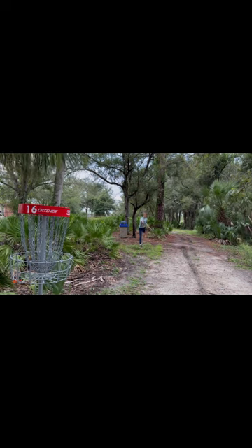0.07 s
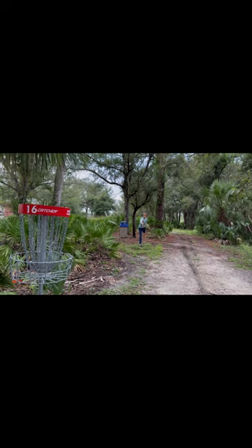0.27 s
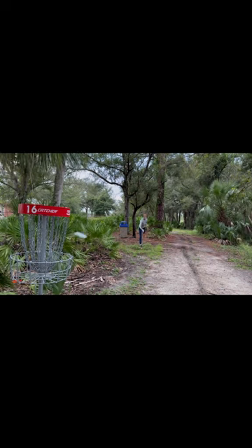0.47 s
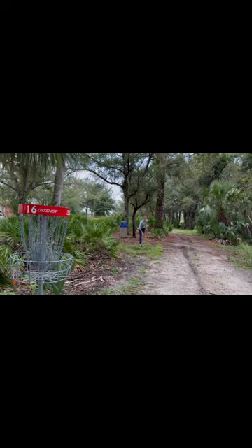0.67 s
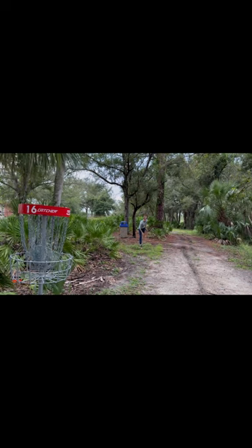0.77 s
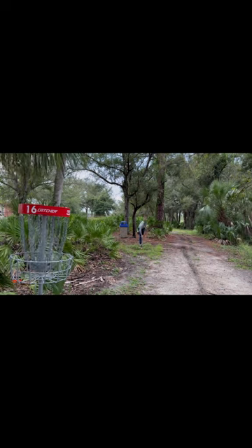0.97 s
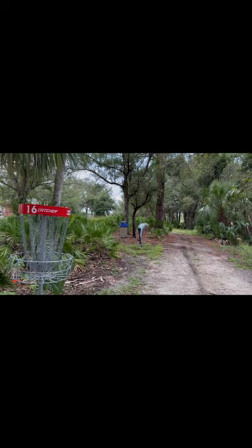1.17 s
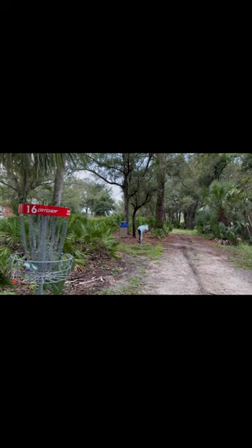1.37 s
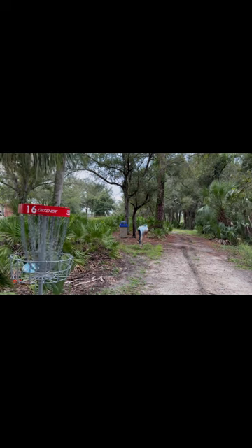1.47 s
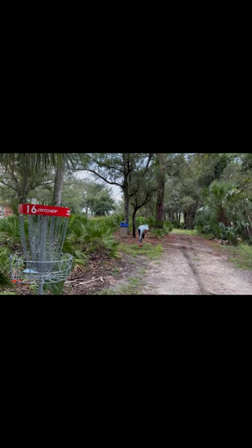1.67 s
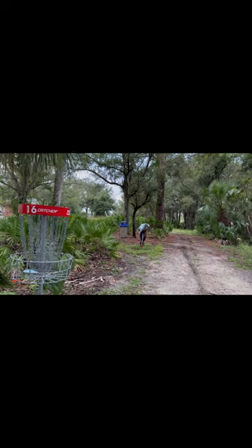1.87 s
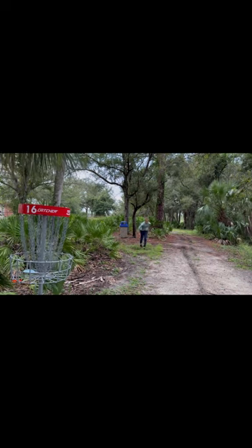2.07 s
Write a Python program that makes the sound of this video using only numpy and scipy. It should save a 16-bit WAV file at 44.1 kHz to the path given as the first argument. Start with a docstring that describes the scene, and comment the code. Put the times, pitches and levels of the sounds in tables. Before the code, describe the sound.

Close stereo pickup of metal chains struck by a flying disc: dull plastic knocks inside a sharp crash, ringing links, a late clank, then sparse ticks fading over low outdoor rumble and soft tree hush.

```python
"""The hanging chains of a steel disc golf basket rattle in surges as a flying disc crashes into them.
The rattle is runs of uneven contacts that excite a thicket of short modes; slapped wires ring along.
Heavy links clang as swelling, beating partials, light links jingle from random touches, and the plastic
disc adds dull, damped knocks. A faint noise tail scatters the basket's sound in the wood.
Behind it lie a low outdoor rumble, a far drone and a soft hush of trees, all shaped noise."""
import sys
import numpy as np
from scipy import signal
from scipy.fft import rfft, irfft
from scipy.io import wavfile
from scipy.ndimage import uniform_filter1d

SR = 44100
rng = np.random.default_rng(int(sys.argv[2]) if len(sys.argv) > 2 else 0)


def wav_record(signal):
    """Record a signal, one row per channel, as 16-bit PCM in the file named by sys.argv[1]."""
    frames = np.transpose(np.atleast_2d(signal))
    bounded = np.clip(frames, -1, 1)
    # unit amplitude maps onto the largest positive 16-bit level
    quanta = np.round(bounded * 32767).astype(np.int16)
    wavfile.write(sys.argv[1], SR, quanta)


N = 93977
T = np.arange(N) / SR  # seconds
IMPACT_S = .5655
CONTACT_SPREAD_DB = 3.5  # unevenness from contact to contact


def from_db(db):
    """Decibels to gain."""
    return 10 ** (np.asarray(db) / 20)


def rms_one(x):
    """Scale to unit rms."""
    return x / np.sqrt(np.mean(x ** 2) + 1e-20)


def evened(x, size):
    """Hold the running level, averaged over size samples, near rms 1."""
    x = rms_one(x)
    power = uniform_filter1d(np.mean(x ** 2, axis=0), size=size)
    return x / np.sqrt(power + 1e-6)


def at_hz(points, hz):
    """Read a table on a log-frequency axis."""
    f, value = np.transpose(points)
    return np.interp(np.log(np.maximum(hz, 1)), np.log(f), value)


def at_time(points, s):
    """Read a curve in time."""
    return np.interp(s, *np.transpose(points))


def clicks(s, strength):
    """Impulses at the given times; those past the end are dropped."""
    samples = np.clip(np.ravel(s) * SR, 0, N).astype(int)
    return np.bincount(samples, np.ravel(strength), N + 1)[:N]


def at_mics(z, hz):
    """A complex partial reaches the two microphones with its own phase and level difference."""
    # Each row: frequency in Hz, phase by which left leads right in radians.
    mic_phase = [(300, .1), (1000, .6), (1550, 1.6), (1900, .4), (3000, 2.3), (3800, 0), (5200, -.1),
                 (5700, .6), (6800, .8), (7600, 2.8), (7950, 5.6), (8600, 6.2), (9400, 5.1), (10000, 4.1),
                 (10400, 3.85), (10900, 3.2), (11400, 3.1), (12200, 2.65), (12800, 1.7), (13500, .1)]
    # Random scatter of that phase from mode to mode. Each row: frequency in Hz, spread in radians.
    phase_scatter = [(300, .15), (1000, .3), (2000, .9), (3500, 1.1), (4300, .15), (5600, .8), (7500, .8),
                     (8500, .35), (10400, .1), (11200, .04), (12500, .25), (16000, .2)]
    # Each row: frequency in Hz, left minus right in dB.
    mic_balance = [(300, 0), (700, 5), (1500, -2.5), (3000, 6), (4400, 5.5), (6500, 3), (8500, -0.5),
                   (16000, 0)]
    phase = at_hz(mic_phase, hz) + at_hz(phase_scatter, hz) * rng.standard_normal()
    lean = from_db(at_hz(mic_balance, hz) / 2)
    left = z.imag * lean
    right = (z * np.exp(-1j * phase)).imag / lean
    return np.array([left, right])


def ring(drive, hz, t60):
    """One mode, a decaying complex resonator set ringing by clicks, in stereo."""
    pole = np.exp((2j * np.pi * hz - np.log(1000) / max(t60, 1e-3)) / SR)
    return at_mics(signal.lfilter([1], [1, -pole], drive + 1e-18), hz)


def contacts(s, db, length, count):
    """Each collision is a fading run of uneven contacts: their times and strengths."""
    fade_db = 6.0  # over the length of the run
    along = (np.arange(count) + rng.random((len(s), count))) / count
    along[:, 0] = 0
    size = from_db(CONTACT_SPREAD_DB * rng.standard_normal(along.shape) - fade_db * along)
    size /= np.sqrt(np.sum(size ** 2, axis=1, keepdims=True))  # same energy for every run
    return s[:, None] + length[:, None] * along, from_db(db)[:, None] * size


def mid_side(mid, side):
    """Mid and side to left and right."""
    return mid + side * [[1], [-1]]


def air(spectrum):
    """Stereo noise of a given colour, partly alike in both ears; rms 1."""
    alike = 0.57  # 0 is unrelated, 1 is identical
    colour = from_db(at_hz(spectrum, np.fft.rfftfreq(N, 1 / SR)))
    mid, side = irfft(rfft(rng.standard_normal((2, N))) * colour, N)
    return rms_one(mid_side(np.sqrt(1 + alike) * mid, np.sqrt(1 - alike) * side))


def rumble():
    """Low outdoor noise, evened out and then swelled along a level curve."""
    # Colour of the rumble. Each row: frequency in Hz, relative level in dB.
    rumble_colour = [(20, -41), (35, 2), (52, -2), (67, 6.5), (90, 2.5), (120, 5.5), (180, -11.5),
                     (300, -36)]
    # Swell of the rumble. Each row: time in seconds, level in dB.
    rumble_swell = [(0, -47.5), (.26, -47), (.42, -48.5), (.7, -45), (.88, -47.5), (.96, -42.5),
                    (1.04, -45), (1.22, -43.5), (1.33, -43.5), (1.42, -36.5), (1.52, -51), (1.57, -40.5),
                    (1.62, -43.5), (1.68, -32), (1.78, -45.5), (1.88, -39.5), (1.96, -46), (2.1, -41.5)]
    return from_db(at_time(rumble_swell, T)) * evened(air(rumble_colour), size=3500)


def hum():
    """A low drone from far away: noise through two resonances at one pitch, its level evened."""
    hum_hz, width_hz, level_db = 65.6, 7.3, -42.5
    noise = rng.standard_normal((2, N + SR))
    broad = signal.lfilter(*signal.iirpeak(hum_hz, 2, fs=SR), noise)
    narrow = signal.lfilter(*signal.iirpeak(hum_hz, hum_hz / width_hz, fs=SR), broad)
    mid, side = narrow[:, SR:]  # skip the resonators' build-up
    return from_db(level_db) * evened(mid_side(mid, 0.14 * side) + 1e-18, size=9000)


def trees():
    """The soft hush of trees: steady coloured noise."""
    # Each row: frequency in Hz, relative level in dB.
    tree_colour = [(100, -9), (200, 0.5), (400, -2.5), (800, -2), (1200, -7), (2000, -12.5), (3200, -20.5),
                   (5000, -21.5), (9000, -20.5), (10300, -30), (11500, -94), (16000, -60)]
    return from_db(-46) * air(tree_colour)


def woods(x):
    """Faint, dull scatter from trunks and leaves: a decaying noise tail convolved with the sound."""
    level_db, t60_s, cut_hz, delay_s = -13.5, 0.29, 3000, .012
    age = T[:SR]
    tail = rng.standard_normal((2, SR)) * np.exp(-np.log(1000) * age / t60_s) * (age > delay_s)
    lowpass = signal.butter(1, cut_hz, fs=SR, output="sos")
    tail = signal.sosfilt(lowpass, rms_one(tail) / np.sqrt(SR))
    return from_db(level_db) * signal.fftconvolve(x, tail, axes=1)[:, :N]


def disc():
    """Dull, quickly damped knocks of the plastic disc against chains, pole and tray."""
    # Each row: start in seconds, level in dB before trim, length in seconds, brightness in dB per octave.
    knocks = [(0.555, -34.5, 0.0051, -6), (0.5665, -23.5, 0.0029, 1), (.588, -27, .012, -8.5),
              (0.6158, -27, 0.0031, -6), (0.62, -24, .004, -1), (0.864, -32, 0.00426, -2),
              (1.637, -36.5, 0.0016, 0)]
    # Modes of the disc. Each row: frequency in Hz, relative level in dB, t60 in seconds.
    disc_modes = [(275, -8.5, 0.032), (337, -8.5, 0.073), (453, -5, 0.07), (553, 1, 0.044),
                  (665, 3.5, 0.057), (732, 1.5, 0.036), (870, 6, 0.052), (1013, 2, 0.065), (1130, 6, 0.028),
                  (1354, -1, 0.052), (1560, -4, 0.04), (1790, 3, .025)]
    trim_db = 3.5
    s, db, length, bright = np.transpose(knocks)
    when, size = contacts(s, db, length, count=3)
    body = np.zeros((2, N))
    for hz, level, t60 in disc_modes:
        tilt = from_db(bright * np.log2(hz / 800))[:, None]
        blows = clicks(when, size * tilt * rng.choice([-1, 1], size.shape))
        body += from_db(level) * ring(blows, hz, t60)
    return from_db(trim_db) * body / np.sqrt(len(disc_modes))


def jingle(count=7):
    """Light links touch at random and ring high; the swing of the chains sets the level."""
    # Light links differ slightly in pitch, so each of their modes is a cluster.
    # Each row: centre in Hz, spread to either side in Hz, relative level in dB.
    jingle_clusters = [(10365, 105, 0), (10330, 230, -8), (11010, 80, -8), (11780, 90, -16),
                       (12200, 250, -18)]
    # Each row: time in seconds, level in dB before trim.
    jingle_level = [(0.572, -31), (0.592, -23.5), (0.756, -37.5), (0.778, -34), (0.822, -36.5),
                    (0.842, -34), (0.96, -45.5), (1.01, -34.5), (1.076, -45), (1.098, -35), (1.178, -47),
                    (1.21, -37.5), (1.23, -48.5), (1.316, -35), (1.33, -47), (1.536, -42), (1.554, -52),
                    (1.632, -44.5), (1.946, -62.5), (1.986, -51), (2.068, -63), (2.12, -56)]
    trim_db, t60_s, touches_per_s, spread_db = 7, 0.18, 220, 3.5
    touches = (rng.random(N) < touches_per_s / SR) * from_db(spread_db * rng.standard_normal(N))
    rings = np.zeros((2, N))
    for centre, spread, db in jingle_clusters:
        for hz in centre + spread * np.linspace(-1, 1, count):
            rings += from_db(db) * ring(touches * rng.standard_normal(N), hz, t60_s)
    onset = np.clip((T - IMPACT_S) / .006, 0, 1)  # silent until the impact
    return evened(rings, size=1300) * from_db(trim_db + at_time(jingle_level, T)) * onset


def clangs():
    """Heavy links swell as they grind together, then ring in beating modes until neighbours damp them."""
    # Each row: start in seconds, level in dB before trim, build-up in seconds, ring t60 in seconds,
    # detuning in Hz.
    strikes = [(.5663, -27, .002, 0.23, 192), (0.614, -16.5, 0.0054, 0.203, 88),
               (0.6255, -12, .003, 0.091, 32), (0.6324, -8, 0.0054, 0.12, 26), (0.646, -24, .004, 0.1, 29),
               (.668, -25.5, .007, 0.36, 27.5), (.693, -22, 0.0064, 0.24, 33.5),
               (0.711, -30, .006, .2, 27.5), (0.767, -32, 0.0052, 0.22, 78), (.797, -41, .004, 0.22, -1),
               (0.833, -23.5, 0.0078, 0.17, 114), (.8445, -21, 0.0037, 0.12, 35),
               (0.913, -40.5, 0.0026, 0.22, 17), (1.089, -27, 0.0032, 0.23, 64.5),
               (1.206, -36.5, 0.004, 0.18, 100), (1.237, -35, .003, 0.17, 30),
               (1.4398, -19, 0.0018, 0.07, 56), (1.4536, -28.5, 0.0045, 0.69, 0),
               (1.507, -45, 0.0027, 0.095, 56), (1.8235, -57, .002, 0.57, 29)]
    # Modes of heavy links. Each row: frequency in Hz before detuning, relative level in dB,
    # share of the ring time.
    link_modes = [(4323, 0, 1.0), (4372, -12, .45), (4430, -16, .4), (4495, -17, .35), (4650, -23, .25),
                  (4860, -24, .2), (11770, -27, .2), (12060, -24, .2), (12310, -23, .2), (12750, -26, .2),
                  (14190, -29, .25)]
    trim_db, spread_db = -1.0, 3
    out = np.zeros((2, N))
    for s, db, build_up, t60, detune in strikes:
        start = int(s * SR)
        age = T[:min(N - start, SR)]
        swell = np.minimum(age / max(build_up, 1e-4), 1)
        for hz, level, share in link_modes:
            gain = from_db(trim_db + db + level + spread_db * rng.standard_normal())
            decay = np.log(1000) / (t60 * share)
            partial = swell * np.exp((2j * np.pi * (hz + detune) - decay) * age)
            # modes weaker than the first start at a random phase
            turn = np.exp(2j * np.pi * rng.random() * (level < link_modes[0][1]))
            out[:, start:start + len(age)] += gain * at_mics(partial * turn, hz)
    return out


def frame():
    """A chain slaps a wire of the basket; each slap rings the wire modes near its own pitch."""
    # Each row: start in seconds, level in dB before trim, frequency that it excites most in Hz.
    slaps = [(.567, -20, 1780), (.783, -31, 6900), (1.040, -38, 3000), (1.043, -31, 7900),
             (1.091, -30.5, 6200), (1.117, -40, 6400), (1.212, -36, 4960), (1.241, -49, 4940),
             (1.28, -47, 4930), (1.4405, -32, 5300), (1.453, -30.5, 5630), (1.506, -40, 6000),
             (1.8254, -34, 8010), (1.826, -39, 3440)]
    # Wires and rings of the basket. Each row: frequency in Hz, relative level in dB, t60 in seconds.
    frame_modes = [(1420, 10.5, 0.079), (2350, -9, 0.2), (2960, -1, 0.23), (3060, 3.5, 0.19),
                   (3790, -0.5, .2), (4690, -1, 0.16), (4880, -3, 0.12), (5273, -2.5, 0.063),
                   (5560, -4, 0.065), (6370, -6, 0.119), (6620, 3.5, 0.047), (6943, -11, .16),
                   (7150, 2.5, .12), (7900, -13, 0.15), (8530, -2, 0.313), (9430, -8, 0.28)]
    trim_db, width_octaves = -4.5, 0.2
    s, db, centre = np.transpose(slaps)
    out = np.zeros((2, N))
    for hz, level, t60 in frame_modes:
        nearness = np.exp(-.5 * (np.log2(hz / centre) / width_octaves) ** 2)
        out += ring(clicks(s, from_db(trim_db + db + level) * nearness), hz, t60)
    return out


def rattle(count=180):
    """Contacts between links excite a thicket of short modes and a dry tick."""
    # Bunches of links collide. Each row: start in seconds, level in dB before trim, length in seconds,
    # brightness in dB per octave.
    surges = [(0.5627, -17.5, .022, -2.5), (0.584, -19.5, 0.024, -2.5), (0.606, -19, 0.025, -2),
              (0.624, -26.5, 0.033, 8), (0.65, -28, .05, 4), (.70, -36, .05, 7),
              (0.759, -39.5, 0.026, -5.5), (0.777, -30.5, .014, 0.5), (.805, -37, 0.036, -3),
              (.837, -32.5, 0.024, 0.5), (0.871, -37.5, .04, -2), (0.921, -36.5, 0.044, -3.5),
              (0.957, -31, 0.018, -3), (0.996, -46, 0.03, -6), (1.037, -38, .025, 0),
              (1.071, -38, .015, -1.5), (1.088, -32, 0.0114, 0.5), (1.113, -31.5, 0.023, 0.5),
              (1.142, -40, 0.033, 5.5), (1.191, -43, 0.011, -2), (1.208, -42, .03, -0.5),
              (1.278, -40.5, 0.016, 0), (1.304, -46, 0.045, 6.5), (1.375, -43.5, .008, 3),
              (1.4383, -45, 0.0079, -6), (1.447, -35, .009, 2), (1.505, -42, 0.04, -4),
              (1.625, -41, 0.023, -4.5), (1.685, -44.5, 0.024, -4.5), (1.746, -45, 0.011, -3.5),
              (1.829, -40, .006, 2), (1.843, -49, 0.028, 5), (1.959, -55, .01, -5), (2.038, -53.5, .008, 6)]
    # Light rubbing of the swinging chains between surges. Each row: time in seconds,
    # level in dB before trim.
    sway = [(.57, -49), (.8, -49), (1.1, -54), (1.4, -58.5), (1.75, -58), (2.13, -67)]
    # Colour of the rattle. Each row: frequency in Hz, relative level in dB.
    rattle_colour = [(1250, -5), (1500, 1), (2050, -9), (2600, 0), (3500, -2.5), (4100, -3), (4600, 3),
                     (5400, -1), (6700, 4.5), (8200, 3.5), (9100, 1), (10000, 5), (11400, -45), (12200, 4),
                     (13300, -0.5), (15800, -7)]
    ring_db, ring_t60_s = 4.0, 0.11
    tick_db, tick_t60_s = 15.5, 0.013
    rub_count = 500
    s, db, length, bright = np.transpose(surges)
    when, size = contacts(s, db, length, count=14)
    rub_s = np.linspace(IMPACT_S, T[-1], rub_count) + rng.uniform(0, .01, rub_count)
    rub_size = from_db(at_time(sway, rub_s) + CONTACT_SPREAD_DB * rng.standard_normal(rub_count))

    def drive(hz):
        """Every contact strikes each mode with a strength of its own."""
        tilt = from_db(bright * np.log2(hz / 6000))[:, None]
        blows = clicks(when, size * tilt * rng.standard_normal(size.shape))
        return blows + clicks(rub_s, rub_size * rng.standard_normal(rub_count))

    def bank(pitches, t60):
        """Sum coloured modes that share one decay."""
        return sum(from_db(at_hz(rattle_colour, hz)) * ring(drive(hz), hz, t60) for hz in pitches)

    pitches = np.linspace(1250, 15800, count) + rng.uniform(-25, 25, count)  # Hz
    rings = bank(pitches, ring_t60_s)
    ticks = bank(pitches[::4], tick_t60_s)
    return (from_db(ring_db) * rings + from_db(tick_db) * ticks) / np.sqrt(count)


def scene():
    """The basket, its scatter in the wood and the background."""
    background = rumble() + hum() + trees()
    basket = disc() + jingle() + clangs() + frame() + rattle()
    return basket + woods(basket) + background


def record(dry):
    """The highest peaks are rounded and the top is cut steeply at 16 kHz."""
    rounded = dry / (1 + (dry / .75) ** 6) ** (1 / 6)
    return signal.sosfilt(signal.ellip(12, .1, 80, 16000, fs=SR, output="sos"), rounded)


dry = scene()
out = record(dry)
wav_record(out)
```